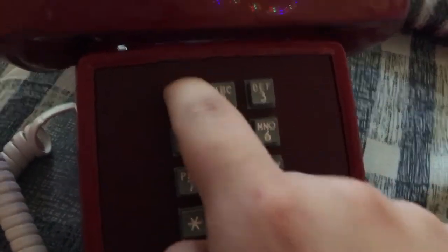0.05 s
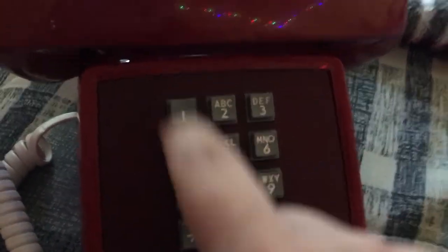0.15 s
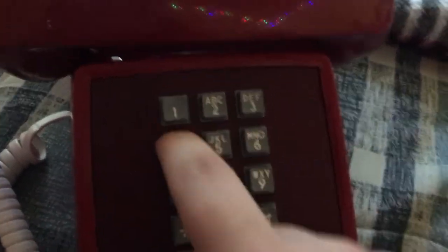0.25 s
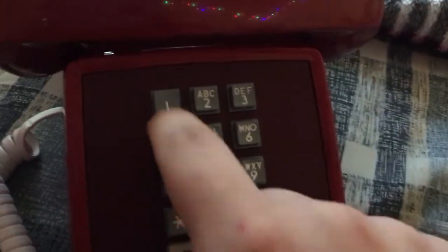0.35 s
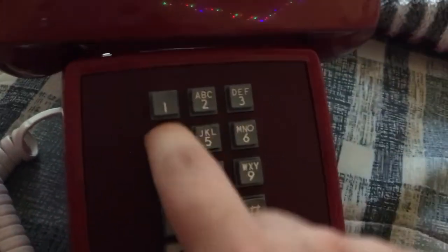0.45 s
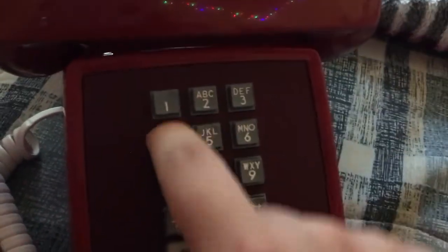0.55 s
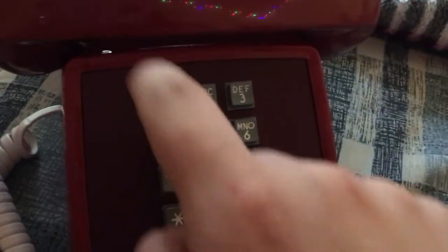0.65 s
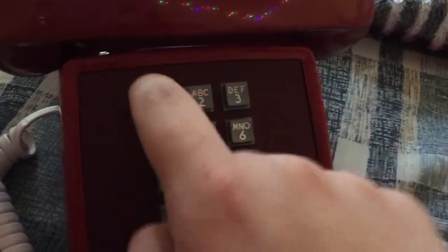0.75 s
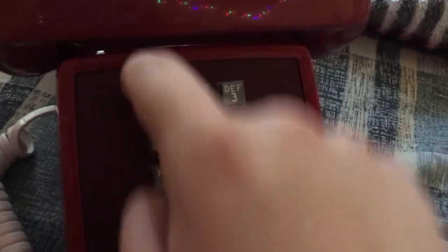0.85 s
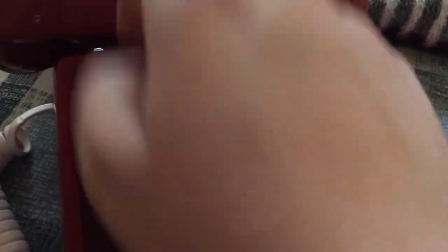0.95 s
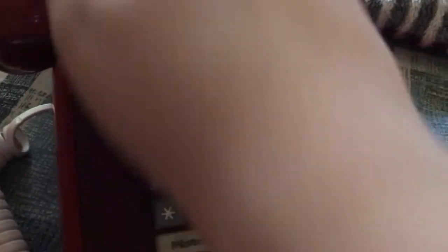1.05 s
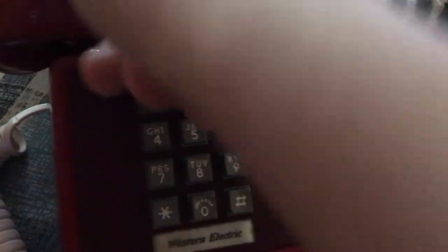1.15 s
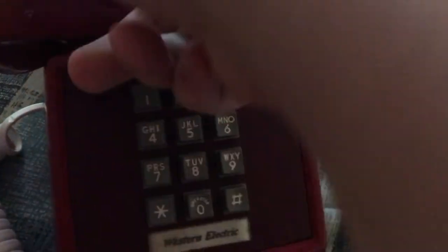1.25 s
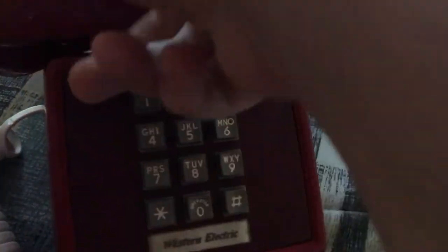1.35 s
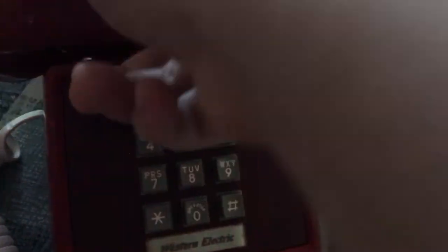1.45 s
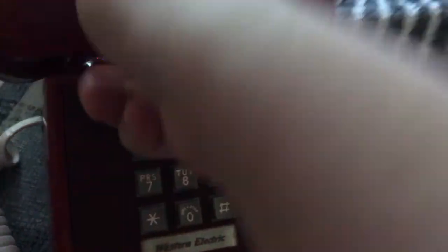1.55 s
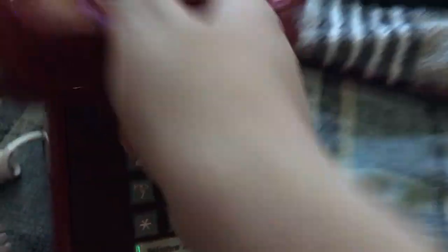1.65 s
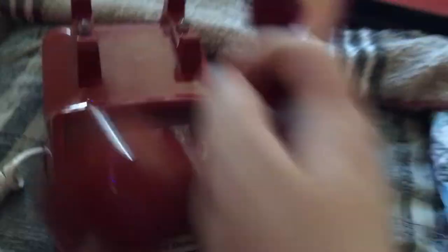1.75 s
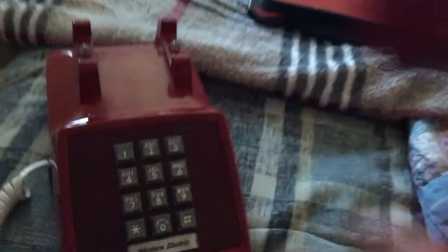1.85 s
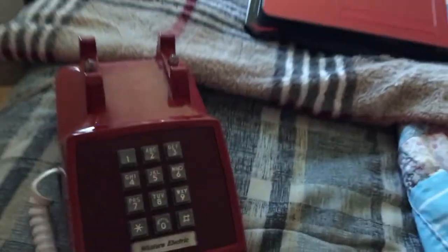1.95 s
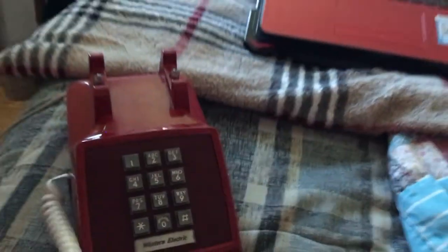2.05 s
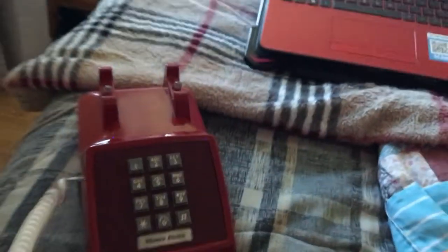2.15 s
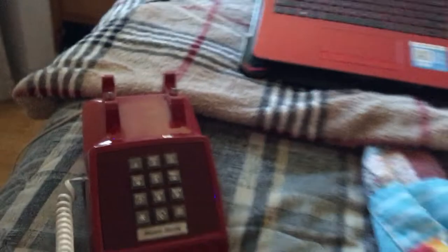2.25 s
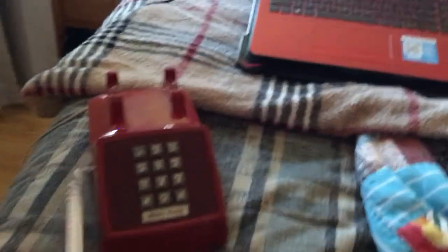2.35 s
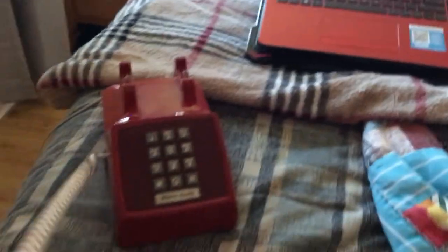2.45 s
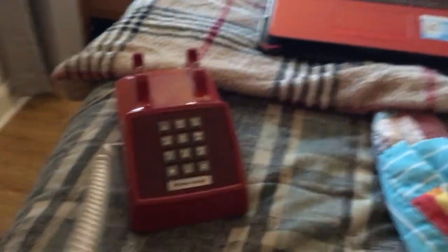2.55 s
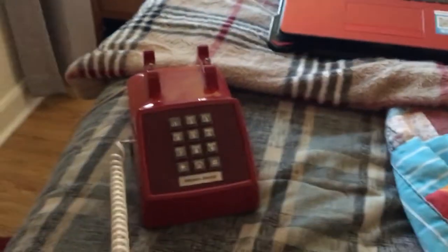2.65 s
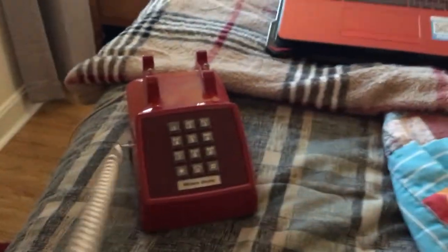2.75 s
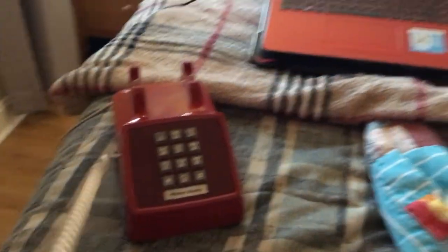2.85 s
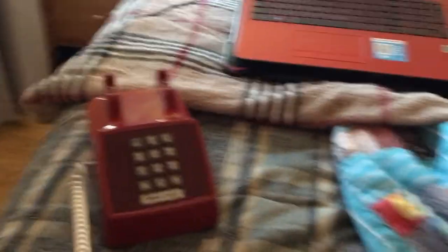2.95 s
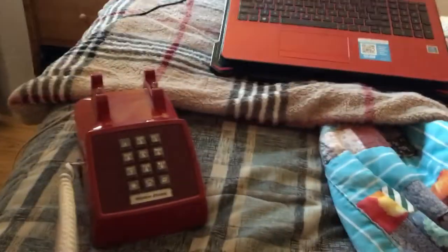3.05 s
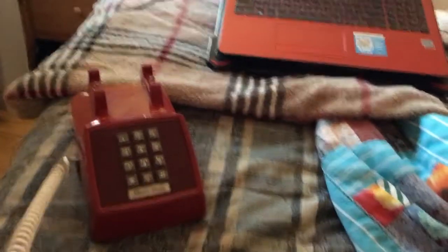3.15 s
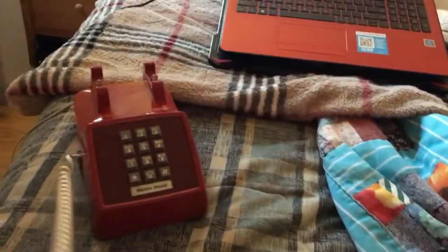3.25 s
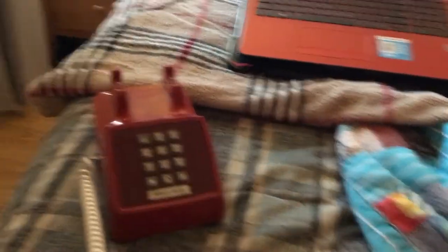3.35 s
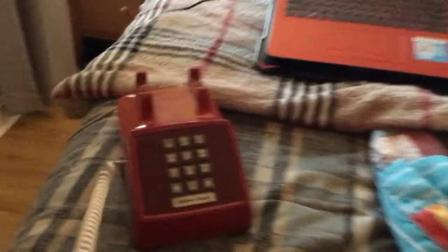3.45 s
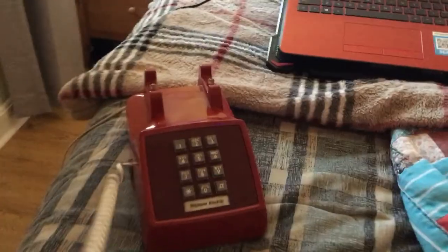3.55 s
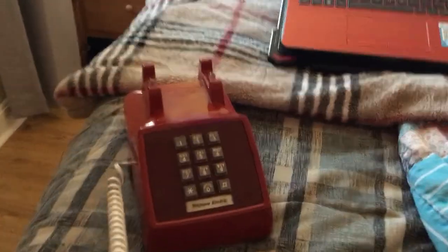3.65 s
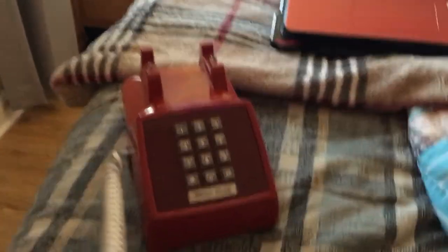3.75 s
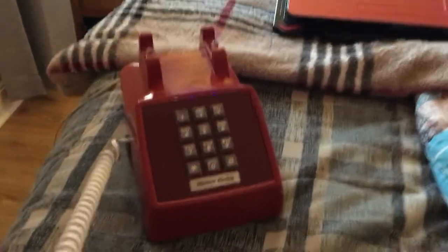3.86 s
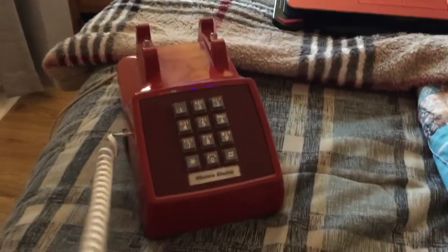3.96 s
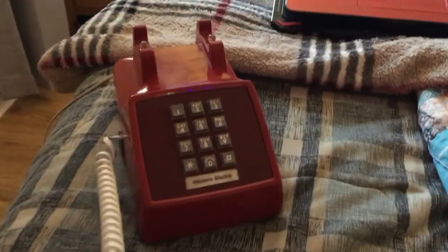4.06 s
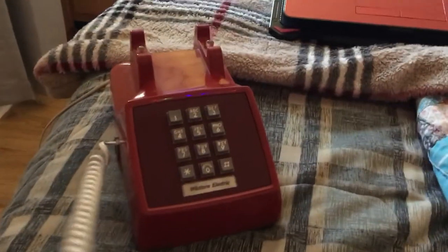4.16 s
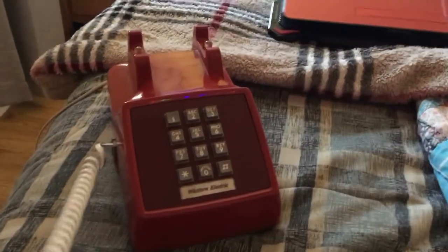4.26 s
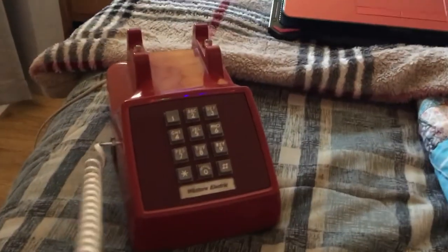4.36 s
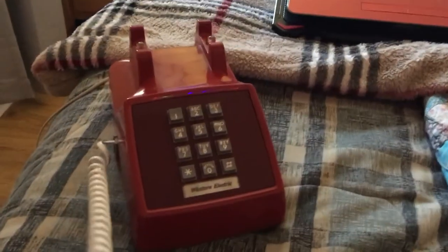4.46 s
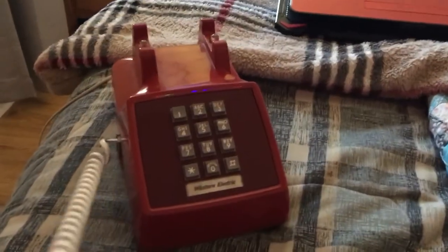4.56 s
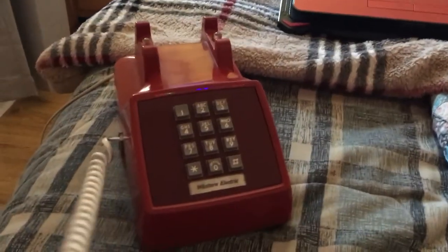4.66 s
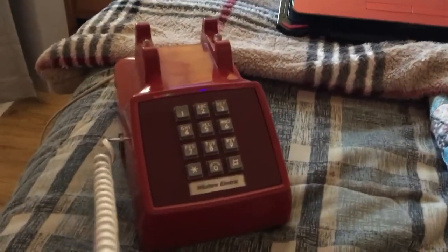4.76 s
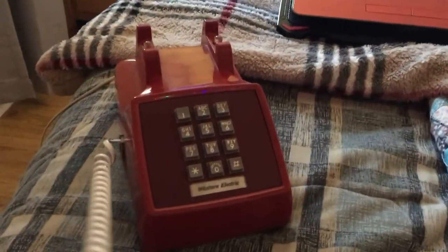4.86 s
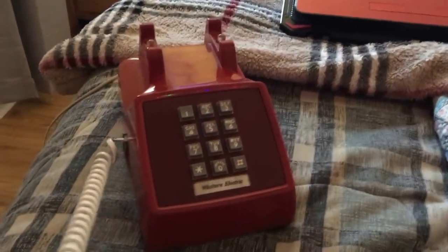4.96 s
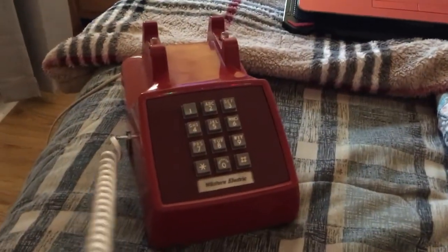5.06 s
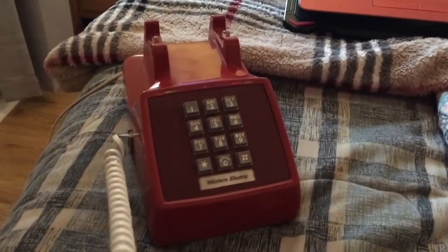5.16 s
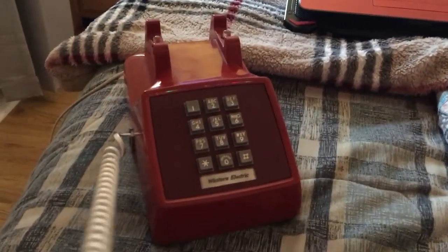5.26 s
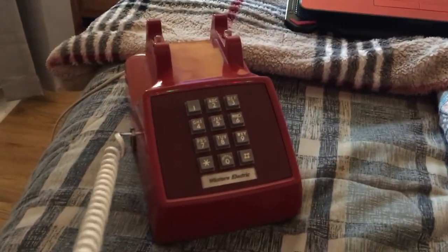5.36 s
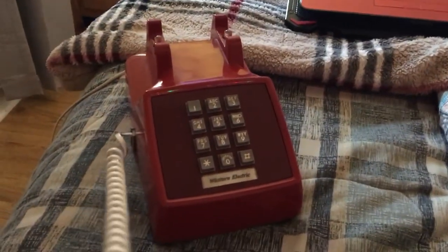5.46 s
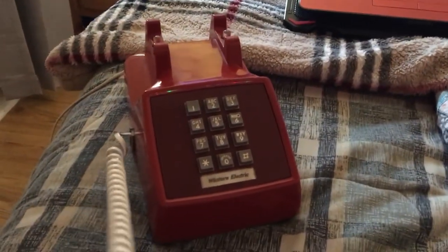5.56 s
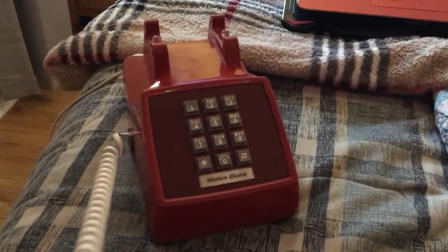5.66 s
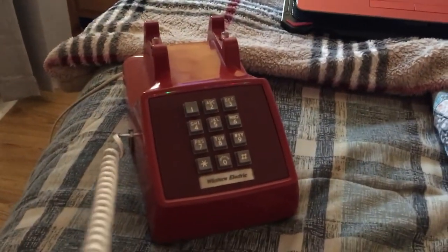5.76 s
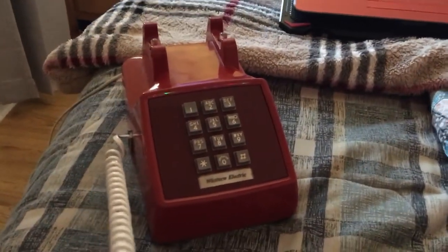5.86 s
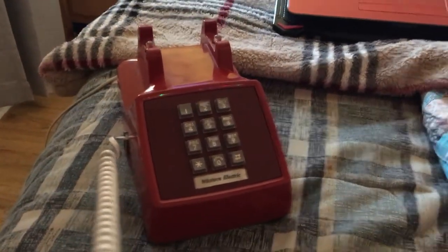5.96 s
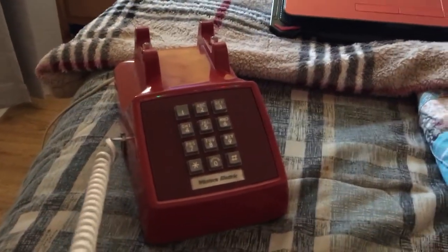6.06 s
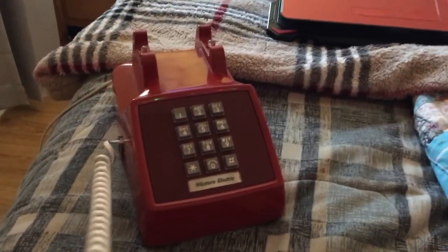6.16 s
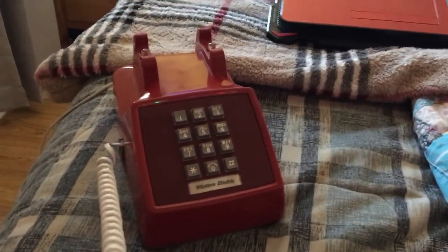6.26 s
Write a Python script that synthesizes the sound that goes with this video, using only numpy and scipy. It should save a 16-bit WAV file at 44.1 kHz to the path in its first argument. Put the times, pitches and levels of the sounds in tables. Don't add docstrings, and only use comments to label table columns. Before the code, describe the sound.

Close, dry mono sound in a small furnished bedroom, over a steady low motor hum near 87 Hz, airy whirr and light hiss. Telephone keys are pressed at about 0.03, 0.30, 0.57 and 0.89 s, each a short scrape and plastic click; releases snap back at 0.15, 0.41 and 0.71 s, the first and third the loudest sounds, each with a tiny rebound. Soft thuds sink into bedding. From 1.0 to 1.7 s a hollow handset knocks its cradle, notably at 1.15, 1.50, 1.58 and 1.65 s, with small ticks around 1.4 s. Fingers rub the plastic, strongest at 1.76 s, and the hook switch clacks up at 1.88 s with quick bounces. Faint stirring fades by 2.6 s. A small cord brush comes at 3.4 s. Around 4.2 s the fan whirr drops, leaving quieter hum, with faint low creaks from 5.06 to 5.5 s.

```python
import sys
import numpy as np
from scipy import signal
from scipy.fft import rfft, irfft, next_fast_len
from scipy.io import wavfile
from scipy.ndimage import uniform_filter1d, map_coordinates

SR = 44100
rng = np.random.default_rng(int(sys.argv[2]) if len(sys.argv) > 2 else 0)


def natural_amplitude(level_db):
    exponent = np.asarray(level_db, float) / 20
    return 10 ** exponent


def log_audio(samples):
    frames = np.atleast_2d(samples).T
    limited = np.clip(frames, -1, 1)
    pcm = np.round(limited * 32767).astype(np.int16)
    wavfile.write(sys.argv[1], SR, pcm)


N = 278712

# (frequency [Hz], width [Hz], level [dB])
BASE_MODES = [(430, 92, -0.5), (640, 170, 1.5), (985, 300, 0.5), (1230, 216, 2), (1728, 310, -3.5),
              (2200, 1300, -7)]
# (frequency [Hz], width [Hz], level [dB])
KEYCAP_MODES = [(1750, 600, -4), (2300, 500, -3.5), (2965, 480, -2), (4080, 780, -3.5), (4582, 370, -3),
                (6000, 700, 3.5)]
# (frequency [Hz], width [Hz], level [dB])
TICK_MODES = [(8370, 1240, 8.5), (9730, 880, 7), (10900, 3000, -2.5), (15200, 1600, -8.5)]
# (time [s], peak [dB], bright tick [dB], favoured resonance [Hz], travel time [s])
PRESSES = [
    (0.0343, -22, -4.5, 5000, .016),
    (0.2962, -21.5, -11, 1560, .03),
    (0.5674, -19.5, -9, 6000, .027),
    (0.8865, -25.5, -4, 1560, .016),
]
# (time [s], peak [dB], favoured resonance [Hz], rebound flight [s], rebound [dB])
RELEASES = [
    (0.1463, -14.5, 3000, .0313, -24.5),
    (0.4118, -23.5, 1560, .0348, -25),
    (0.7136, -15.5, 2900, .0303, -25.5),
]
FAN_OFF_S, FAN_FADE_S = 4.2, .03


def unit(x):
    return x / np.sqrt(np.mean(x ** 2) + 1e-20)


def along(points, hz):
    f, v = np.transpose(points)
    return np.interp(np.log(hz + 1), np.log(f + 1), v)


def curves(rows):
    s, *cols = np.transpose(rows)
    return [np.interp(np.arange(N) / SR, s, c) for c in cols]


def wobble(rate_hz):
    knots = rng.standard_normal(int(N * rate_hz / SR) + 4)
    return map_coordinates(knots, [np.arange(N) * rate_hz / SR])


def switch(at_s, width_s):
    return .5 + .5 * np.tanh((np.arange(N) / SR - at_s) / width_s)


def filtered(x, response):
    n = x.shape[-1]
    m = next_fast_len(n + SR // 20)
    return irfft(rfft(x, m) * response(np.fft.rfftfreq(m, 1 / SR)), m)[..., :n]


def body(modes):
    def response(f):
        total = 0
        for k, (hz, width_hz, db) in enumerate(modes):
            damping = 1j * f * width_hz
            total = total + (-1) ** k * natural_amplitude(db) * damping / (hz * hz - f * f + damping)
        return total
    return response


def rush(spectrum, patchy_db):
    z = signal.stft(rng.standard_normal(N + SR), nperseg=512)[2]
    field = uniform_filter1d(rng.standard_normal(z.shape), 6, 0)
    field = uniform_filter1d(field, 12, 1)
    x = signal.istft(z * natural_amplitude(patchy_db * unit(field)), nperseg=512)[1][:N]
    return unit(filtered(x, lambda hz: natural_amplitude(along(spectrum, hz))))


def echo(x):
    # (frequency [Hz], t60 [s])
    room_t60 = [(200, 0.13), (1000, 0.18), (4000, 0.23), (12000, 0.13)]
    hz, t, z = signal.stft(rng.standard_normal(len(x)), SR, nperseg=256)
    decay = natural_amplitude(-60 * t / along(room_t60, hz)[:, None])
    tail = signal.istft(z * decay, SR, nperseg=256)[1]
    delayed = np.pad(x, (180, 0))
    return signal.fftconvolve(delayed, tail / np.linalg.norm(tail))[:len(x)]


def contacts(rows, shell, part, edge, onset_s, blow, spiky_db, shell_drag, wet_db, shell_wet_db):
    out, t = np.zeros(N + SR), np.arange(SR // 4) / SR
    dull = lambda f: 1 / (1 + 1j * f / 7000) ** 3
    thin = lambda f: (1j * f / (6000 + 1j * f)) ** 3
    rise = (1 - np.exp(-t / onset_s)) ** 2
    for s, db, knock_db, tick_db, length_s, hz in rows:
        fall_db = -20 * (t / max(length_s, 1e-3)) ** 1.3
        spikes = natural_amplitude(spiky_db * rng.standard_normal(len(t)))
        impacts = rise * rng.standard_normal((3, len(t))) * spikes
        impacts[:, round(2 * onset_s * SR)] += blow
        struck = lambda f: body(part)(f) * dull(f) * (1.0 + body([(hz, .3 * hz, 0)])(f))
        knock = filtered(impacts[0] * natural_amplitude(fall_db / shell_drag), body(shell))
        click = filtered(impacts[1] * natural_amplitude(fall_db), struck)
        tick = filtered(impacts[2] * natural_amplitude(1.1 * fall_db), lambda f: body(edge)(f) * thin(f))
        knock, click, tick = [v / np.abs(v).max() for v in (knock, click, tick)]
        low = natural_amplitude(knock_db) * knock
        high = click + natural_amplitude(tick_db) * tick
        wet = echo(natural_amplitude(shell_wet_db) * low + natural_amplitude(wet_db) * high)
        out[round(s * SR):][:len(t)] += natural_amplitude(db) * (low + high + wet)
    return out[:N]


def motor():
    # (time [s], shaft [Hz], level [dB], strain [dB])
    motor_run = [(0, 87.12, -52.5, -1), (1, 87.3, -52.5, 1.5), (1.5, 86.67, -53.5, -1),
                 (1.9, 87.5, -55, -7), (2.1, 87, -52, -5), (2.7, 86.52, -52, -5), (3, 86.82, -52, 1.5),
                 (3.2, 85.96, -52.5, 1), (3.6, 86.64, -53, 0), (3.9, 85.5, -55, 0), (4.25, 86.62, -52, -3),
                 (4.5, 85.96, -59.5, -3), (4.9, 85.05, -60, -1), (5.15, 86.3, -60, -8),
                 (5.4, 86.3, -57, -10), (6.32, 85.35, -57, -9)]
    # (frequency [Hz], level [dB per Hz])
    chirp_spectrum = [(2300, -120), (2520, -10.5), (2650, 1), (2780, -10), (3100, -120)]
    hz, db, strain_db = curves(motor_run)
    off = switch(FAN_OFF_S, FAN_FADE_S)
    third_db = -67.5 + strain_db
    whine_db = -77 + 1.6 * strain_db - 8 * off
    turn = 2 * np.pi * np.cumsum(hz + .25 * wobble(6)) / SR
    first = natural_amplitude(db + 3 + 1.1 * wobble(11)) * np.sin(turn)
    third = natural_amplitude(third_db + 2 + 0.83 * wobble(16)) * np.sin(3 * turn)
    second = natural_amplitude(db - 15 + 1.8 * wobble(2.5)) * np.sin(2 * turn)
    whine = natural_amplitude(whine_db + 1.5 + 1.6 * wobble(11)) * (np.sin(10 * turn) + 0.71 * np.sin(6 * turn))
    throb = np.cos(turn / 9.55) ** 4
    chirp = natural_amplitude(-80.5 + 1.5 * wobble(6)) * switch(at_s=2.4, width_s=.5) * (1 - off)
    return first + third + second + whine + chirp * throb * rush(chirp_spectrum, patchy_db=0)


def room_air():
    # (frequency [Hz], level [dB per Hz])
    rumble_spectrum = [(7.1, -53), (12, -35.5), (16, -25.5), (18, -17), (24, -14), (36, 2), (78, 4.5),
                       (100, -27), (170, -120)]
    # (frequency [Hz], level [dB per Hz])
    drone_spectrum = [(56, -33), (95, -1), (113, -16), (151, -7.5), (183, -10.5), (263, -12.5),
                      (302, -16.5), (381, -16.5), (600, -24.5), (780, -45), (1320, -120)]
    # (frequency [Hz], level [dB per Hz])
    whirr_spectrum = [(240, -45), (400, -14.5), (664, -1.5), (805, -5.5), (870, -3.5), (1100, -4.5),
                      (1340, -7.5), (2200, -16), (2860, -57), (4840, -120)]
    # (frequency [Hz], level [dB per Hz])
    hiss_spectrum = [(880, -27), (1500, -9), (2210, 1.5), (2940, 1), (3180, 0), (4000, -0.5), (4920, -5.5),
                     (5330, -2.5), (6630, -0.5), (7610, -5), (9010, -3), (10600, -7.5), (11900, -3.5),
                     (15100, -12), (16000, -3.5)]
    # (time [s], level over stillness [dB])
    stir_curve = [
        (0, 4),
        (1, 2.5),
        (2.0, 6),
        (2.12, 2),
        (2.28, 4),
        (2.41, 2),
        (2.58, 0),
        (6.32, 0),
    ]
    (stir_db,) = curves(stir_curve)
    fan_drop_db = 4.5 * switch(FAN_OFF_S, FAN_FADE_S)
    rumble = natural_amplitude(-55 + 1.2 * wobble(2.2)) * rush(rumble_spectrum, patchy_db=-0.5)
    drone = natural_amplitude(-62.5 + .45 * stir_db + .7 * wobble(2.9)) * rush(drone_spectrum, patchy_db=-0.7)
    whirr = natural_amplitude(-70.5 + stir_db - fan_drop_db) * rush(whirr_spectrum, patchy_db=-0.4)
    hiss = natural_amplitude(-72.5 + .55 * stir_db) * rush(hiss_spectrum, patchy_db=-0.16)
    return rumble + drone + whirr + hiss


def slides():
    # (time [s], peak [dB], shell knock [dB], bright tick [dB], length [s])
    brushes = [
        (0.425, -53, -6, 0, .012),
        (1.735, -59, -22, -2, 0.022),
        (1.752, -47, -24, -14, 0.016),
        (2.128, -60, 5, -20, .006),
        (2.26, -67.5, 7, -18, .015),
        (2.395, -66, 9, -20, 0.0087),
        (3.409, -53, -23, 2, 0.0089),
        (3.416, -60, -25, 7.5, 0.033),
    ]
    rows = [(s - travel_s, db - 28.5, -6, -2, .85 * travel_s, 4700) for s, db, _, _, travel_s in PRESSES]
    rows += [row + (3800,) for row in brushes]
    return contacts(rows, BASE_MODES, KEYCAP_MODES, TICK_MODES, onset_s=0.0072, blow=0, spiky_db=3.5,
                    shell_drag=2.5, wet_db=-10, shell_wet_db=-3)


def keys():
    # (time [s], peak [dB], shell knock [dB],
    # bright tick [dB])
    grazes = [
        (.0245, -49, -8, 6),
        (.2916, -35, -12, -1),
        (.5642, -36.5, -12, 6),
        (.5795, -38, 5, -16),
        (.8755, -54, -6, 11),
    ]
    # (time [s], peak [dB], shell knock [dB], bright tick [dB], rattle length [s])
    hook_hits = [
        (1.8833, -17.5, -3.5, -8, 0.0051),
        (1.894, -35, 2.5, -18, 0.0053),
        (1.911, -39, 0, -8, 0.016),
    ]
    rows = [(s, db, knock_db, tick_db, .0065, 5400) for s, db, knock_db, tick_db in grazes]
    for s, db, tick_db, hz, _ in PRESSES:
        bottom = (s, db, -7.5, tick_db, .0052, hz)
        seat = (s + .0105, db - 26, 8, -20.5, .007, 1700)
        rows += [bottom, seat]
    for s, db, hz, flight_s, rebound_db in RELEASES:
        snap = (s, db, -10.5, -.5, .009, hz)
        rebound = (s + flight_s, rebound_db, -4.5, -19, .0036, 2100)
        settle = (s + 1.33 * flight_s, rebound_db - 19, 11.5, -26, .0065, 1700)
        rows += [snap, rebound, settle]
    rows += [row + (2100,) for row in hook_hits]
    return contacts(rows, BASE_MODES, KEYCAP_MODES, TICK_MODES, onset_s=.0007, blow=5.4, spiky_db=4.5,
                    shell_drag=2.9, wet_db=-21.5, shell_wet_db=-6.5)


def thuds():
    # (time [s], peak [dB])
    sinkings = [
        (0.724, -37),
        (1.152, -33),
        (1.17, -35),
        (1.449, -42),
        (1.504, -33),
        (1.55, -40),
        (1.646, -39.5),
    ]
    # (frequency [Hz], width [Hz], level [dB])
    bedding_modes = [(190, 110, 3), (263, 40, -4), (335, 130, 3)]
    blows, t = np.zeros(N + SR), np.arange(SR // 10) / SR
    nudges_s = [row[0] for row in PRESSES + RELEASES]
    nudges_s += [s + flight_s for s, _, _, flight_s, _ in RELEASES]
    for s, db in sinkings + [(s, -45) for s in nudges_s]:
        blows[round(s * SR):][:len(t)] += natural_amplitude(db + 15 - 60 * t / 0.13) * rng.standard_normal(len(t))
    return filtered(blows[:N], lambda f: body(bedding_modes)(f) / (1 + 1j * f / 450) ** 2)


def handset():
    # (time [s], peak [dB], shell knock [dB], bright tick [dB])
    cradle_knocks = [(1.0183, -57, -18, -12), (1.113, -48, 3, -8), (1.1501, -27, 4, -5),
                     (1.1623, -44, 10, -17), (1.1699, -39.5, 15, -14), (1.4501, -50.5, 14, -7),
                     (1.503, -33.5, 6.5, -7), (1.5212, -38, 2, -14.5), (1.5332, -45, 4, -14),
                     (1.562, -47, 6, -14), (1.5821, -32.5, -9, -11), (1.6452, -29.5, 5, -15),
                     (1.6614, -43.5, 11.5, -25), (1.6753, -44, 1.5, -26)]
    # (time [s], peak [dB], bright tick [dB], favoured resonance [Hz])
    plunger_ticks = [
        (1.3845, -42.5, 3, 5580),
        (1.3914, -52, 9, 6110),
        (1.4042, -33.5, -8, 3230),
        (1.4297, -36, 0, 3720),
        (1.5525, -60, 13, 9000),
        (1.574, -50, -6, 6500),
    ]
    # (frequency [Hz], width [Hz], level [dB])
    grip_modes = [(460.4, 218, 1.5), (673, 212, 4), (960, 174, -1), (1216, 247, -0.5), (1750, 920, -7.5),
                  (2390, 1030, -13), (3180, 790, -17.5)]
    # (frequency [Hz], width [Hz], level [dB])
    plunger_modes = [(2020, 1070, 0.5), (3000, 700, 5), (3890, 2200, 1), (6580, 920, 2.5)]
    # (frequency [Hz], width [Hz], level [dB])
    edge_modes = [(7400, 1400, 7.5), (9450, 1400, 4.5), (11900, 2500, -10)]
    rows = []
    for s, db, knock_db, tick_db in cradle_knocks:
        rattle_s = .0105 - .00022 * (db + 47)
        rows.append((s, db, knock_db, tick_db, rattle_s, 2200))
    rows += [(s, db, -21, tick_db, .0095, hz) for s, db, tick_db, hz in plunger_ticks]
    return contacts(rows, grip_modes, plunger_modes, edge_modes, onset_s=0.00033, blow=4.8, spiky_db=5.5,
                    shell_drag=3.03, wet_db=-14.5, shell_wet_db=-8.5)


def hand():
    # (time of most pressure [s], level [dB])
    strokes = [
        (1.289, -72),
        (1.435, -74),
        (1.53, -68.5),
        (1.6, -80),
        (1.73, -68.5),
        (1.76, -63),
        (1.805, -67),
    ]
    press_db_per_s, ease_db_per_s = 260, 210
    t = np.arange(N) / SR
    pressure = np.zeros(N)
    for s, db in strokes:
        away_db = press_db_per_s * np.maximum(s - t, 0) + ease_db_per_s * np.maximum(t - s, 0)
        pressure += natural_amplitude(db - away_db)
    skin = [(300, -120), (600, -1), (1500, -2), (4000, -4), (8000, -13), (15000, -8)]  # (Hz, dB per Hz)
    crackle = unit(natural_amplitude(1.8 * wobble(90) + 3 * wobble(610)))
    return pressure * crackle * rush(skin, patchy_db=1.5)


def creaks():
    # (time [s], peak [dB], pitch [Hz], ratio of upper tone [1], t60 [s])
    groans = [(2.262, -52, 495, 1.4, 0.12), (2.397, -68, 520, 1.7, 0.069), (3.415, -64.5, 2600, 1.6, .2),
              (1.755, -52, 2900, 1.02, .08), (1.815, -58, 2900, 1.03, .05), (3.42, -69, 4000, 1.05, .2),
              (5.064, -46.5, 388, 1.93, 0.072), (5.169, -56.5, 422, 2.06, .08),
              (5.279, -54, 422, 2.03, 0.054), (5.396, -55.5, 371, 2, 0.077),
              (5.456, -55.5, 363, 1.9, 0.071)]
    out, t = np.zeros(N + SR), np.arange(SR // 8) / SR
    for s, db, hz, ratio, t60_s in groans:
        drift = 0.038 * np.cumsum(rng.standard_normal((2, len(t))), 1)
        lower = np.sin(2 * np.pi * hz * t + drift[0])
        upper = 0.41 * np.sin(2 * np.pi * ratio * hz * t + drift[1])
        envelope = natural_amplitude(db - 60 * t / t60_s) * (1 - np.exp(-t / 0.001))
        out[round(s * SR):][:len(t)] += envelope * (lower + upper)
    return out[:N]


def scene():
    phone = slides() + keys() + handset() + hand()
    return (phone + thuds() + creaks() + motor() + room_air())[None]


def top_cut(x):
    return signal.sosfilt(signal.butter(12, 16880, fs=SR, output="sos"), x)


def record(dry):
    top_hz, slope_hz = 15900, 120
    mix = filtered(dry, lambda hz: natural_amplitude(-9 * (1 + np.tanh((hz - top_hz) / slope_hz))))
    return top_cut(mix)


dry = scene()
out = record(dry)
log_audio(out)
```